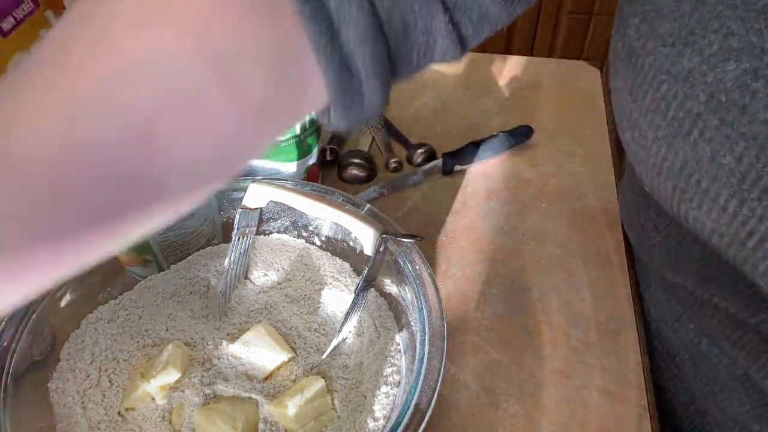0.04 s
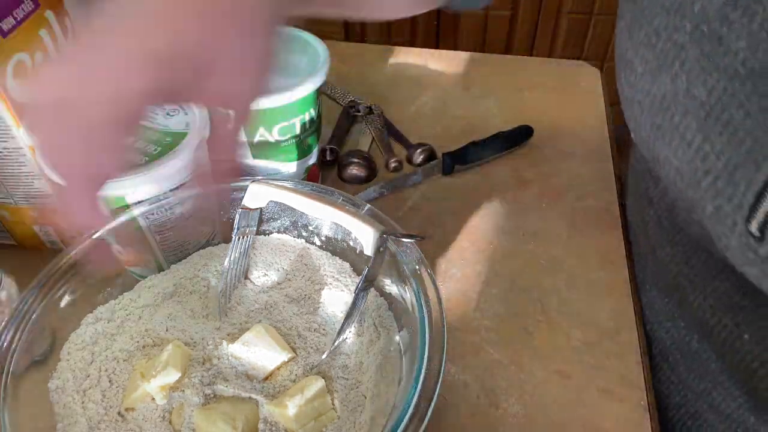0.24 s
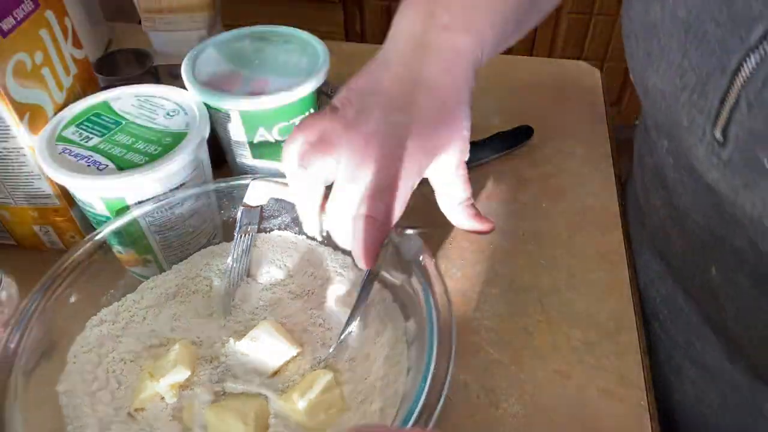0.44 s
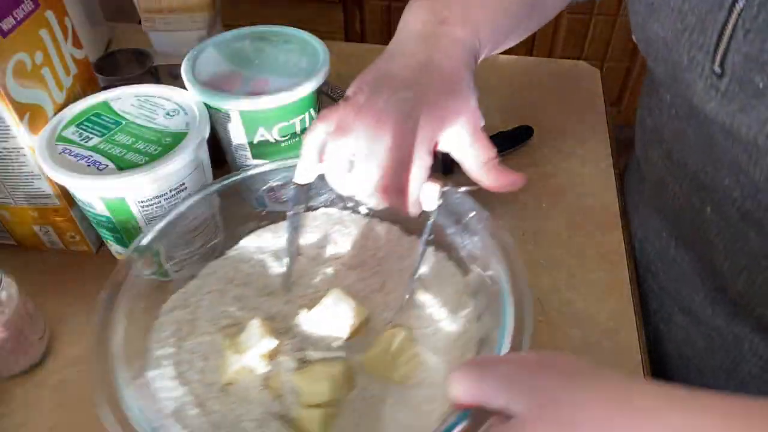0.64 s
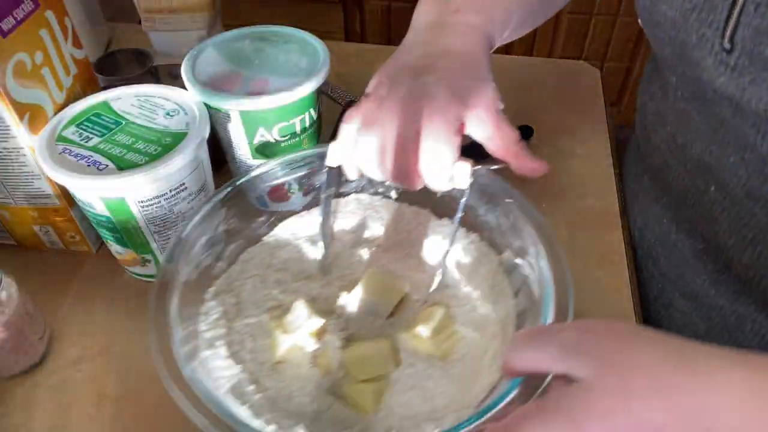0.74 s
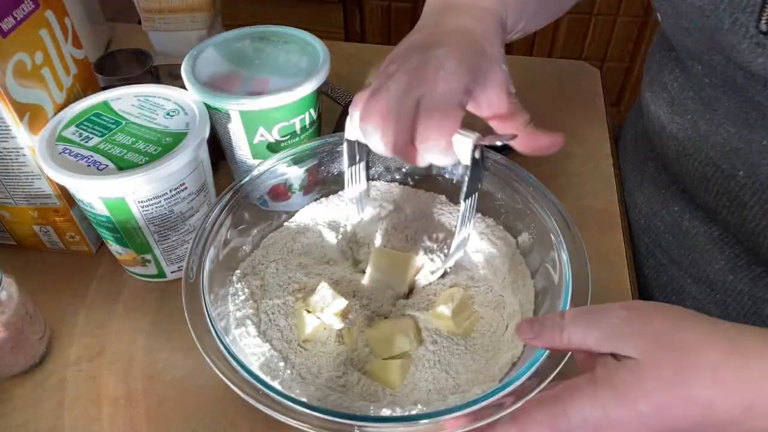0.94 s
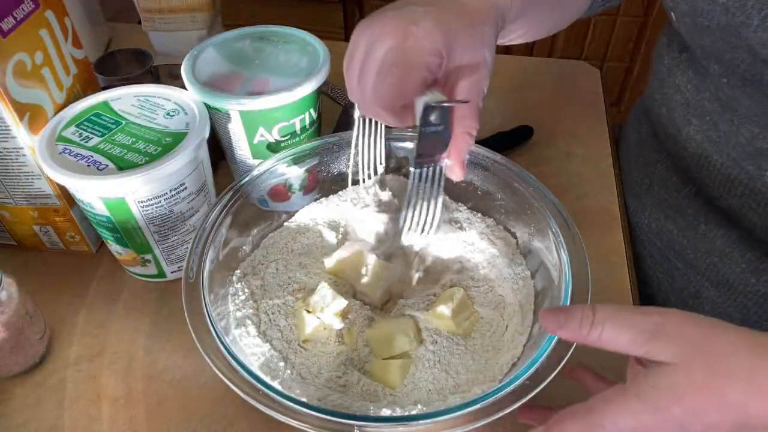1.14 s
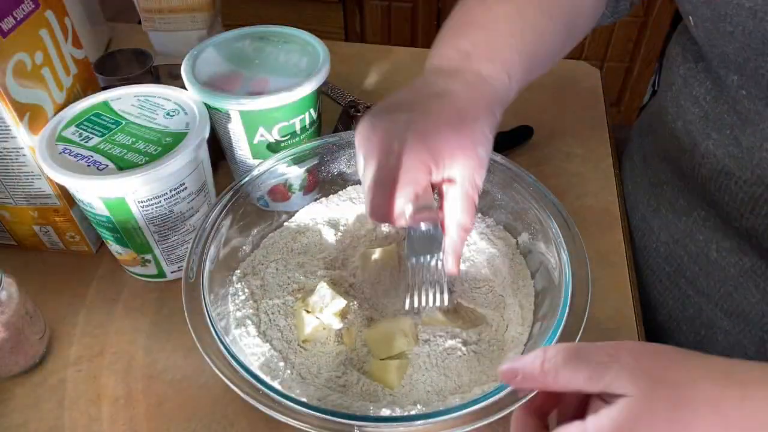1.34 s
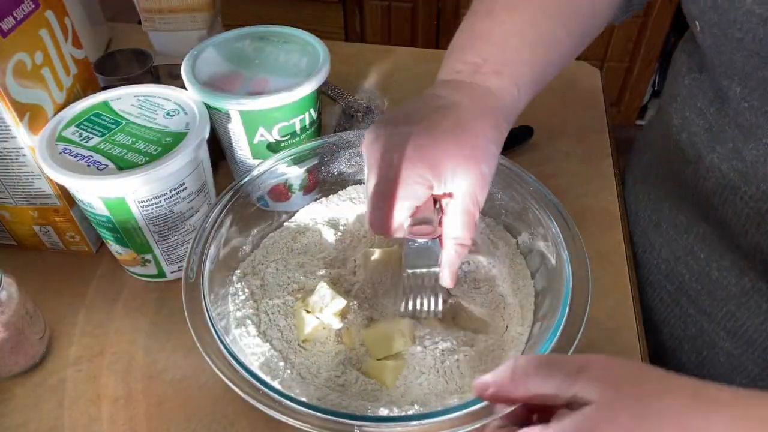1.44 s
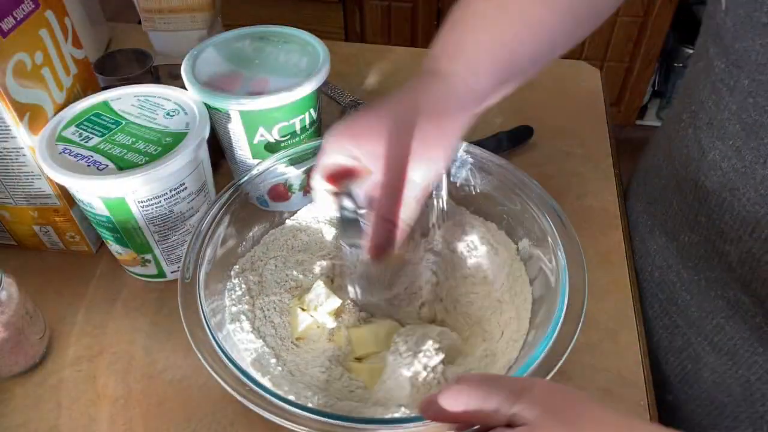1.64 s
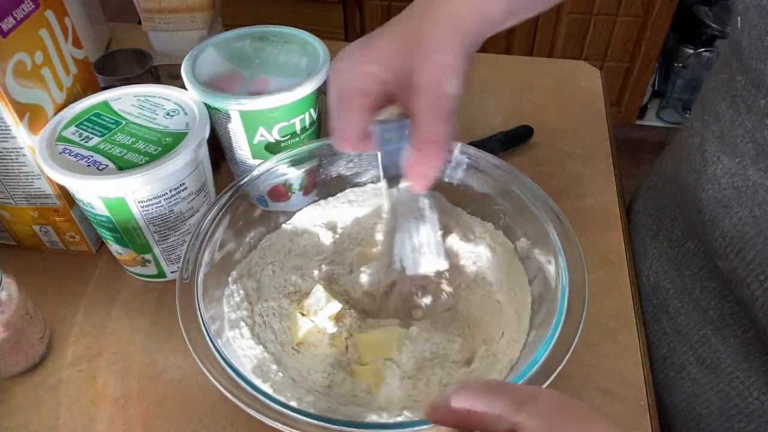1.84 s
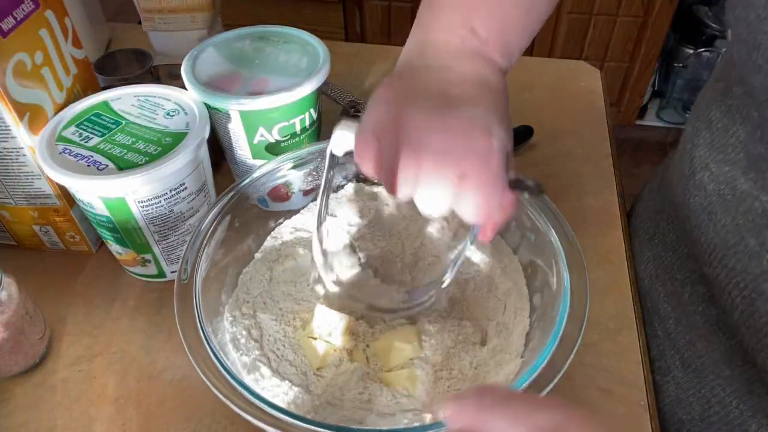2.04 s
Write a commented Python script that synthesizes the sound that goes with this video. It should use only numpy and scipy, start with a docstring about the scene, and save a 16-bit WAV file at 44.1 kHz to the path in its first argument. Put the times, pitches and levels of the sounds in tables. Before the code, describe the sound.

A plastic tub clacks down on a kitchen counter, then a glass bowl drags and metal blades scrape flour

```python
"""Over a low room rumble, a plastic tub rustles and scratches (filtered friction noise) over a low flutter
(a sine), then lands on a kitchen counter: short pushes and noise bursts, with decaying modes of tub, counter,
glass bowl and utensil. After a faint hiss of flour the bowl is dragged across the counter (friction exciting
resonances), a sleeve swishes (shaped noise), and a steel pastry blender sinks through flour and butter:
friction noise makes its blades sing faintly, they tick twice (noise bursts), and it bottoms out with a push."""
import sys
import numpy as np
from scipy import signal
from scipy.fft import rfft, irfft
from scipy.io import wavfile

SR = 44100
rng = np.random.default_rng(int(sys.argv[2]) if len(sys.argv) > 2 else 0)


def file_out(sig):
    """Save sig as 16-bit WAV at sys.argv[1]."""
    # one column per channel
    cols = np.atleast_2d(sig).T
    # limit, then scale
    lim = np.clip(cols, -1, 1)
    pcm = np.round(lim * 32767).astype(np.int16)
    wavfile.write(sys.argv[1], SR, pcm)


N = 92610
T = np.arange(N) / SR  # time, s

# left-right coherence of the diffuse room sound: frequency_hz, coherence [0-1]
COHERENCE = [(100, 0.92), (220, 0.76), (500, 0.076), (1500, 0.043)]


def amp(db):
    """Level definition: an amplitude ratio is 10 to the power of dB / 20."""
    return 10 ** (np.asarray(db) / 20)


def unit(x):
    """Normalisation by effective value: scales a signal to rms 1."""
    return x / np.sqrt(np.mean(x ** 2) + 1e-20)


def read(points, hz):
    """Logarithmic frequency scale: interpolates a table linearly in log frequency."""
    f, value = np.transpose(points)
    return np.interp(np.log(hz + 1), np.log(f + 1), value)


def level(points):
    """Amplitude envelope: gain over time from a dB curve, at -120 dB outside it."""
    s, db = np.transpose(points)
    return amp(np.interp(T, s, db, left=-120, right=-120))


def colour(x, tone):
    """Minimum-phase filtering: the Hilbert transform of the log gain gives the phase of a causal filter."""
    hz = abs(np.fft.fftfreq(4096, 1 / SR))
    log_gain = np.log(amp(read(tone, hz)))
    response = np.exp(np.conj(signal.hilbert(log_gain)))
    taps = np.fft.ifft(response).real[:2048]
    return signal.fftconvolve(x, taps)[:N]


def resonate(x, hz, width):
    """Resonance: shifts a fixed or moving frequency to zero, low-passes twice, shifts back; rms 1."""
    turn = np.exp(2j * np.pi * np.cumsum(hz * np.ones(N)) / SR)
    r = np.exp(-np.pi * abs(width) / SR)
    once = signal.lfilter([1 - r], [1, -r], x / turn)
    twice = signal.lfilter([1 - r], [1, -r], once)
    return unit((turn * twice).real)


def grains(per_s, spread_db):
    """Friction: a dense random train of tiny slips of uneven size."""
    size = amp(spread_db * np.minimum(rng.exponential(1, N), 5))
    slipping = rng.random(N) < per_s / SR
    return unit(rng.standard_normal(N) * size * slipping)


def ring(modes, start):
    """Modal superposition: exponentially decaying sines struck at one moment."""
    t = np.maximum(T - start, 0)
    return sum(amp(db - 60 * t / t60) * np.sin(2 * np.pi * hz * t) for hz, db, t60 in modes)


def burst(start, decay_s):
    """Impulsive excitation: noise with a sudden onset and exponential decay."""
    return rng.standard_normal(N) * (T >= start) * np.exp(-abs(T - start) / decay_s)


def flutter(rate_hz, depth_db):
    """Random amplitude modulation: uneven pressure as a gain wandering at about this rate."""
    hz = np.fft.rfftfreq(N, 1 / SR)
    slow = irfft(rfft(rng.standard_normal(N)) / (1 + (hz / rate_hz) ** 4), N)
    return amp(depth_db * unit(slow))


def place(x, lead_ms, pan_db, wet_db, gap_s=0.0056):
    """Time difference and reverberation: direct sound arrives left first; a diffuse tail decays by frequency."""
    # kitchen reverberation: frequency_hz, t60_s
    room_decay = [(100, 0.24), (260, 0.36), (700, 0.52), (1840, 0.41), (4850, 0.24), (12000, 0.19)]
    count = 26460  # 0.6 s of tail
    taps = rng.standard_normal((2, count)) * (T[:count] > gap_s)
    hz, t, z = signal.stft(taps, SR, nperseg=256)
    like = np.clip(read(COHERENCE, hz), 0, 1)[:, None]
    z[1] = like * z[0] + np.sqrt(1 - like ** 2) * z[1]
    decay = amp(-60 * t / read(room_decay, hz)[:, None])
    tail = signal.istft(z * decay, SR, nperseg=256)[1]
    wet = signal.fftconvolve(x[None], tail / np.linalg.norm(tail[0]), axes=1)[:, :N]
    # a linear phase delays the right channel by fractions of a sample
    cycles = np.fft.rfftfreq(2 * N, 1000 / SR) * lead_ms
    late = irfft(rfft(x, 2 * N) * np.exp(-2j * np.pi * cycles))[:N]
    return (np.array([x, late]) + amp(wet_db) * wet) * amp([[pan_db / 2], [-pan_db / 2]])


def rumble(rumble_db=-39, pan_db=-3.5):
    """Diffuse field: steady room noise, alike left and right in the bass only, plus a wavering hum."""
    # room noise spectrum: frequency_hz, gain_db
    room_spectrum = [(20, -3), (58, 0), (85, -3), (120, 0), (150, -3), (195, 2), (270, -9), (400, -13),
                     (600, -20), (1300, -26), (3000, -35), (6000, -42), (15000, -49)]
    # narrow-band hum: centre_hz, width_hz, level_db
    room_hum = (189.8, 81, -48.5)
    hz = np.fft.rfftfreq(N, 1 / SR)
    a, b = rfft(rng.standard_normal((2, N))) * amp(read(room_spectrum, hz))
    like = np.clip(read(COHERENCE, hz), 0, 1)
    pair = irfft(np.array([a, like * a + np.sqrt(1 - like ** 2) * b]), N)
    hum_hz, width, db = room_hum
    hum = amp(db) * resonate(rng.standard_normal(N), hum_hz, width)
    return (amp(rumble_db) * unit(pair) + hum) * amp([[pan_db / 2], [-pan_db / 2]])


def sleeve():
    """Broadband cloth friction: a soft hiss as the arm turns, mostly heard by way of the room."""
    # swish envelope, before a 2 dB cut: time_s, level_db
    swish = [(1.04, -69), (1.11, -52), (1.18, -48), (1.26, -44.5), (1.32, -58.5), (1.37, -89), (1.42, -70)]
    # cloth spectrum: frequency_hz, gain_db
    cloth_tone = [(350, -5.5), (700, -6.5), (1500, -7.5), (2600, -1), (4800, -8), (8000, -12), (14000, -27)]
    hiss = unit(colour(rng.standard_normal(N), cloth_tone)) * level(swish)
    return place(hiss * amp(-2.0), lead_ms=0.12, pan_db=-2.5, wet_db=5)


def rustle(scratch_width_hz=5200, flutter_hz=60.5):
    """Sliding friction: hand and tub brush past; the tub's slips scratch, over a low flutter near 60 Hz."""
    # brushing envelope: time_s, level_db
    brushing = [(0, -49.5), (.075, -46), (.086, -31), (.125, -42.5), (.155, -27), (.174, -37.5),
                (.215, -33), (.219, -26.5), (.235, -70)]
    # brushing spectrum: frequency_hz, gain_db
    brushing_tone = [(150, 1), (300, 1.5), (600, -4), (1150, -5), (1600, -5), (2500, -5.5), (5000, -2.5),
                     (8000, -7.5), (15000, -14)]
    # gritty scratches as the tub slips: time_s, half_length_s, centre_hz, level_db
    scratches = [(0.088, 0.005, 4400, -36), (0.145, 0.005, 6500, -33), (0.156, 0.004, 5340, -31),
                 (0.167, 0.004, 3870, -27.5)]
    # low flutter envelope: time_s, level_db
    flutter_level = [(.085, -68), (.11, -26.5), (.15, -30), (.185, -50)]
    rub = unit(colour(grains(per_s=3500, spread_db=1.5), brushing_tone)) * level(brushing)
    scratch = np.zeros(N)
    for s, half, hz, db in scratches:
        grit = resonate(grains(per_s=5600, spread_db=3.5), hz, scratch_width_hz)
        scratch += amp(db) * grit * np.exp(-((T - s) / half) ** 2)
    low_flutter = np.sin(2 * np.pi * flutter_hz * T) * level(flutter_level)
    return place(rub, lead_ms=0.1, pan_db=-2.0, wet_db=-4) + scratch + low_flutter


def slide(hiss_db=-1, brighten=1.0, split_hz=3000):
    """Friction-driven resonance: the bowl's foot grates, brighter with speed, and excites the hollow beneath."""
    # slide envelope, which also stands for speed: time_s, level_db
    slide_speed = [(.52, -52.5), (.59, -44), (.69, -41.5), (.83, -41), (.92, -41.5), (.995, -44),
                   (1.06, -78), (1.12, -45)]
    # grating spectrum: frequency_hz, gain_db
    grating_tone = [(60, -32), (340, 6), (540, -0.5), (1200, -4.5), (1480, -10), (1750, -3), (2600, -7),
                    (3600, -12.5), (5300, -16), (7400, -8.5), (11000, -21), (13200, -16.5), (15200, -41)]
    # resonances of the hollow: multiple_of_lowest, width_hz, level_db
    hollow_modes = [(1, 240, -12), (1.6, 300, -17), (3.55, 260, -23)]
    # lowest resonance, shifting as the bowl moves: time_s, pitch_hz
    hollow_pitch = [(.57, 720), (.66, 665), (.8, 690), (.98, 810)]
    # the foot catches and the hollow groans: time_s, half_length_s, boost_db
    catches = [(.828, .012, 6), (.982, .016, 10)]
    # the blender, resting in the bowl, shivers along: centre_hz, width_hz, level_db
    shiver_modes = [(7130, 60, -35), (8460, 330, -22.5)]
    slips = grains(per_s=7000, spread_db=4.0)
    speed = level(slide_speed)
    pitch = np.interp(T, *np.transpose(hollow_pitch))
    hollow = np.zeros(N)
    for multiple, width, db in hollow_modes:
        mode = amp(db) * resonate(slips, multiple * pitch, width)
        hollow += mode * flutter(rate_hz=45, depth_db=4.0)
    groan_db = sum(db * np.exp(-((T - s) / half) ** 2) for s, half, db in catches)
    hollow = hollow * amp(groan_db)
    shiver = sum(amp(db) * resonate(slips, hz, width) for hz, width, db in shiver_modes)
    grating = amp(hiss_db) * unit(colour(slips, grating_tone)) + shiver
    dull = signal.sosfiltfilt(signal.butter(2, split_hz, fs=SR, output="sos"), grating)
    bright = (grating - dull) * (speed / speed.max()) ** brighten
    return place((hollow + dull + amp(3.0) * bright) * speed, lead_ms=0.254, pan_db=-2.5, wet_db=2)


def blender(entry_s=1.355, entry_rise_s=0.035, tick_decay_s=0.0018):
    """Friction and impact: flour excites blade resonances, butter rubs, steel ticks and lands with a push."""
    # hiss envelope of blades in flour: time_s, level_db
    sifting = [(.39, -99), (.44, -56), (.55, -107), (1.34, -59.5), (1.43, -56.5), (1.52, -59), (1.62, -64),
               (1.71, -59), (1.79, -71), (2.08, -55)]
    # flour spectrum: frequency_hz, gain_db
    flour_tone = [(1000, -16), (2500, -9), (5000, -13), (7000, 0), (9000, -1), (11500, -8), (13300, -3),
                  (15000, -10)]
    # single blades singing in the flour: pitch_hz, width_hz, level_db, loudest_s, swell_s
    blades = [(3994, 18, -67, 1.47, .08), (5582, 16, -61, 1.59, .09), (6788, 20, -59, 1.44, .05),
              (8055, 40, -60, 1.46, .06), (8549, 60, -57.5, 1.47, .05), (13184, 110, -59.5, 1.46, .055)]
    # blades pressing through butter and rubbing the bowl: time_s, level_db
    pressing = [(1.33, -65), (1.44, -55), (1.48, -64.5), (1.72, -58), (1.76, -49), (1.81, -53), (1.85, -54),
                (1.91, -53), (1.98, -48.5), (2.1, -43)]
    # butter spectrum: frequency_hz, gain_db
    butter_tone = [(150, -22.5), (350, -0.5), (750, -2.5), (1150, -2.5), (1550, -13.5), (2300, -10.5),
                   (4000, -21.5), (8000, -20), (15000, -73)]
    # blades tick on the glass: start_s, level_db
    glass_ticks = [(1.6283, -26), (1.6431, -32)]
    # tick spectrum: frequency_hz, gain_db
    tick_tone = [(300, 0), (1900, 2), (4400, -8), (7000, 2), (7900, -8), (9200, -1), (12000, -15),
                 (15000, -15)]
    # bottoming out: time_s, level_db, push_length_s
    bottoming = (1.878, -21, 0.0014)
    slips = grains(per_s=16000, spread_db=5.0)
    song = np.zeros(N)
    for hz, width, db, loudest, swell in blades:
        song += amp(db) * resonate(slips, hz, width) / np.cosh((T - loudest) / swell)
    song = song * np.clip((T - entry_s) / entry_rise_s, 0, 1)
    sift = unit(colour(slips, flour_tone)) * level(sifting)
    press = unit(colour(grains(per_s=9900, spread_db=2.0), butter_tone)) * level(pressing)
    ticks = colour(sum(amp(db) * burst(s, tick_decay_s) for s, db in glass_ticks), tick_tone)
    s, db, length = bottoming
    u = (T - s) / length
    thud = amp(db) * u * np.exp((1 - u ** 2) / 2)  # one smooth swing down and up
    return (place(sift + press, lead_ms=0.252, pan_db=-2.0, wet_db=0.0)
            + place(song, lead_ms=0.239, pan_db=-1.0, wet_db=-10.0)
            + place(ticks + thud, lead_ms=0.13, pan_db=-4.5, wet_db=-13.5))


def tub(crack_db=-14, crack_s=0.0039, clack_db=0, clack_s=0.0084, low_cut_hz=130, glass_swell_s=0.012):
    """Impact excitation: brief contacts drive modes of the tub; the counter, bowl and a utensil ring along."""
    # the tub lands rim first, then flat: start_s, level_db, contact_ms
    landing = [(0.2201, -12, 0.24), (0.2225, -1, 0.78), (0.2258, -6, 0.66)]
    # modes of the tub, the counter and the bowl: pitch_hz, level_db, t60_s
    tub_modes = [(221.6, -5, 0.12), (293, 2.5, 0.018), (455, -1, 0.049)]
    counter_modes = [(53.2, -28, 0.42), (122, -15, 0.3), (207.6, -26, 0.11), (348, -22.5, 0.2)]
    glass_modes = [(851, -37, .4), (2016, -29.5, .46), (4081, -49, .25), (5782, -47, .25), (6869, -45, .36),
                   (8850, -46, .22)]
    # a utensil, jolted by the landing: start_s, pitch_hz, level_db, t60_s
    utensil = (.313, 3413, -47, .2)
    # spectra of the sharp crack and the hollow plastic clack: frequency_hz, gain_db
    crack_tone = [(200, -14), (1200, 10), (3200, 7.5), (4400, -7), (8000, 1), (15000, -15)]
    clack_tone = [(300, -6.5), (620, 6.5), (850, 3.5), (1400, 2), (2100, -6), (3200, -26), (4200, -27),
                  (9000, -51)]
    knock = np.zeros(N)
    for s, db, contact_ms in landing:
        push = T[:512] * np.exp(-T[:512] * 4000 / contact_ms)  # longer contact, duller blow
        knock += amp(db) * signal.fftconvolve(ring(tub_modes, s), push / push.sum())[:N]
    knock = signal.sosfilt(signal.butter(2, low_cut_hz, "high", fs=SR, output="sos"), knock)
    first, flat = landing[0][0], landing[1][0]
    crack = amp(crack_db) * colour(burst(first, crack_s), crack_tone)
    clack = amp(clack_db) * colour(burst(first, clack_s), clack_tone)
    boom = ring(counter_modes, flat)
    swell = 1 - np.exp(-abs(T - flat) / glass_swell_s)
    bowl = ring(glass_modes, flat) * swell * amp([[-4], [4]])  # stronger on the right
    ping_s, *ping_mode = utensil
    ping = ring([ping_mode], ping_s)
    return (place(knock, lead_ms=0.46, pan_db=-7.5, wet_db=-12.0, gap_s=0.0084)
            + place(crack + clack, lead_ms=0.22, pan_db=2, wet_db=-11.0)
            + place(boom, lead_ms=0.083, pan_db=-1.5, wet_db=-7.5) + bowl + ping)


def scene():
    """Linear superposition: the sound pressures of all sources add."""
    return rumble() + sleeve() + rustle() + slide() + blender() + tub()


def record(dry, notch_hz=10550, notch_width_hz=520, notch_db=-26, cutoff_hz=15200):
    """Transducer limits: the microphone is deaf in a narrow band, clips at full scale and loses the top treble."""
    hz = np.fft.rfftfreq(2 * N, 1 / SR)
    notch = amp(notch_db * np.exp(-((hz - notch_hz) / notch_width_hz) ** 2))
    heard = irfft(rfft(dry, 2 * N) * notch)[:, :N]
    low_pass = signal.firwin(255, cutoff_hz, window=("kaiser", 8), fs=SR)
    return signal.oaconvolve(np.clip(heard, -1, 1), low_pass[None], "same")


dry = scene()
out = record(dry)
file_out(out)
```